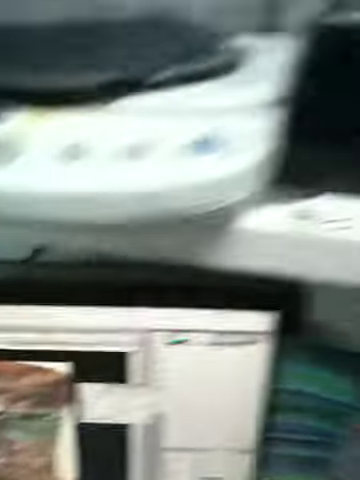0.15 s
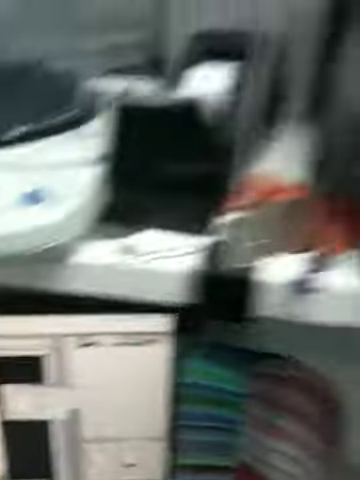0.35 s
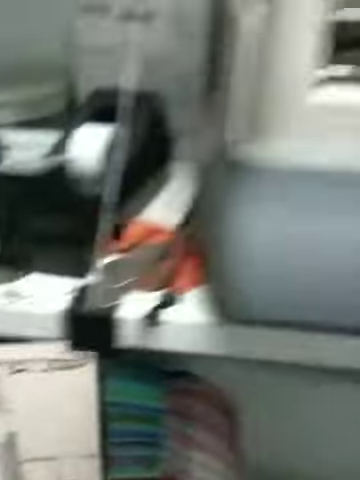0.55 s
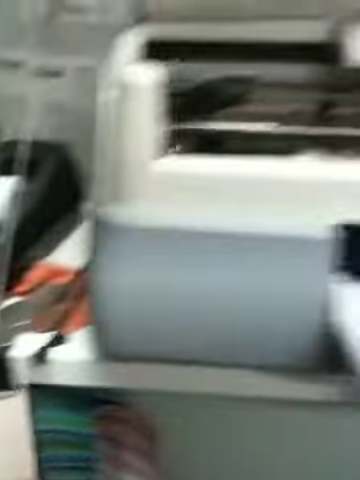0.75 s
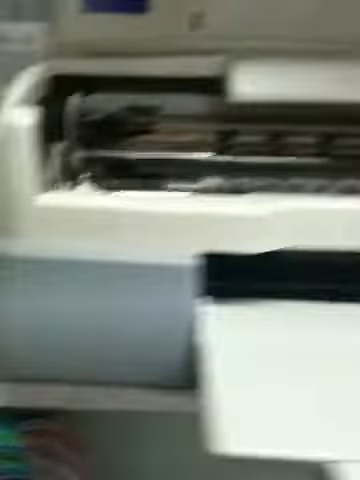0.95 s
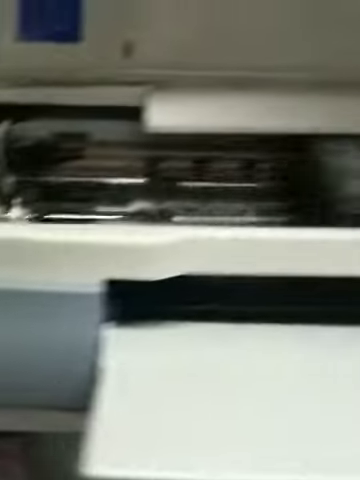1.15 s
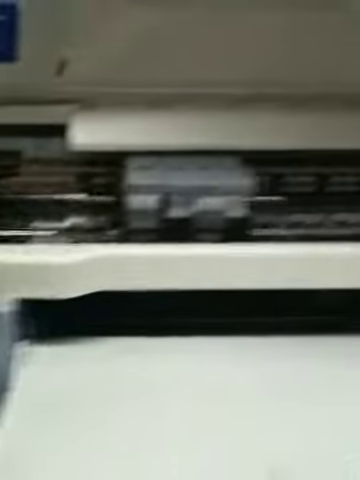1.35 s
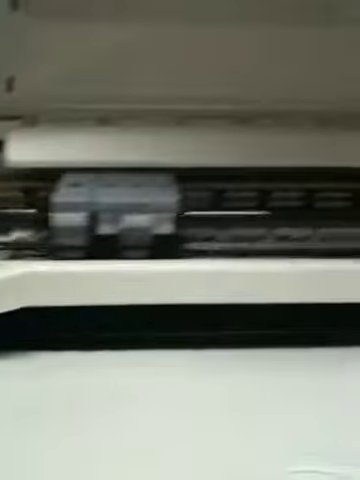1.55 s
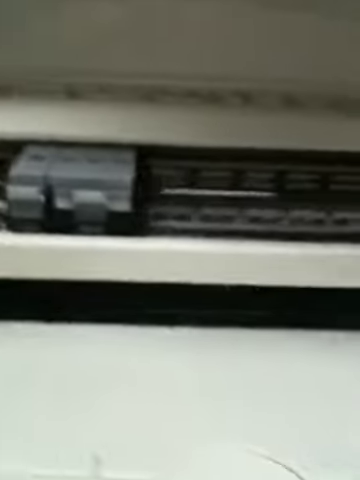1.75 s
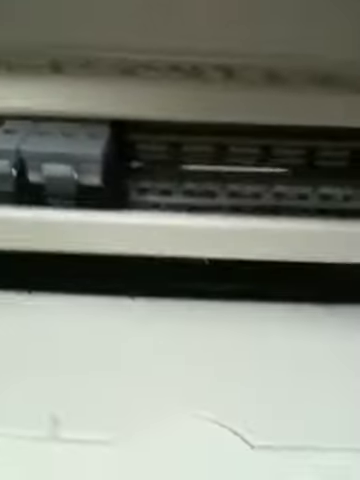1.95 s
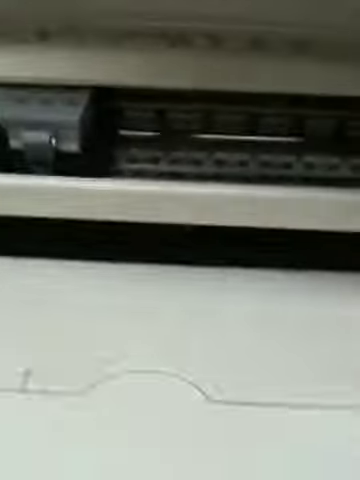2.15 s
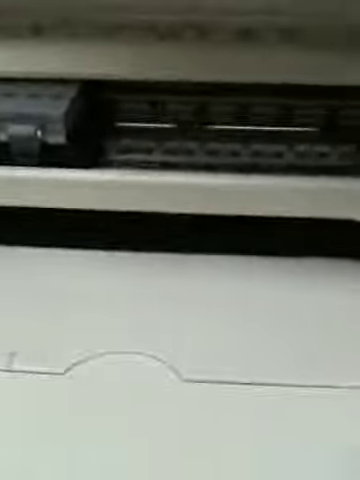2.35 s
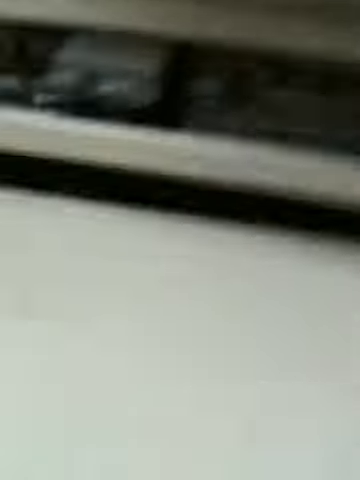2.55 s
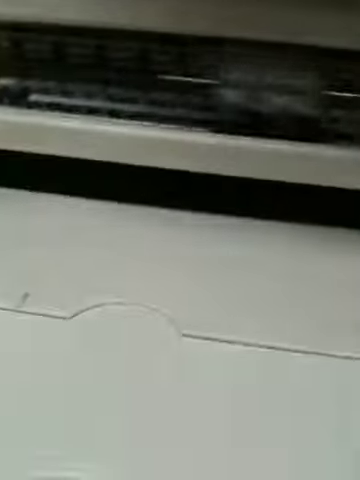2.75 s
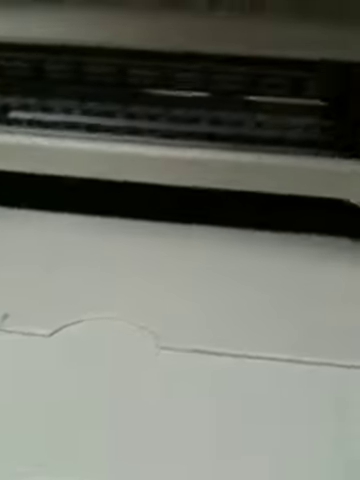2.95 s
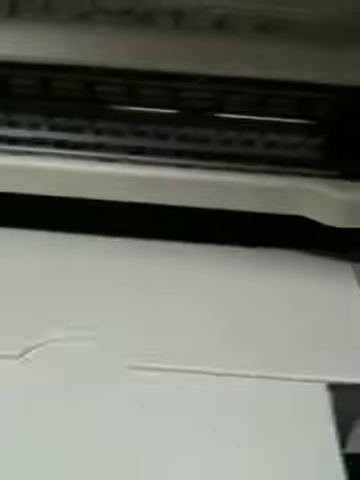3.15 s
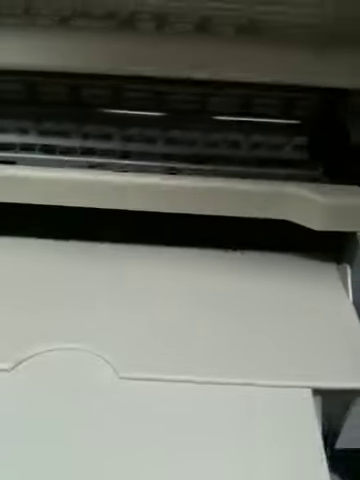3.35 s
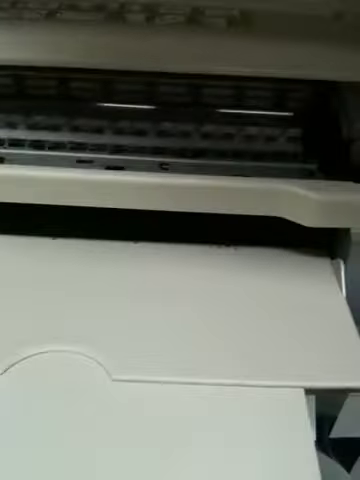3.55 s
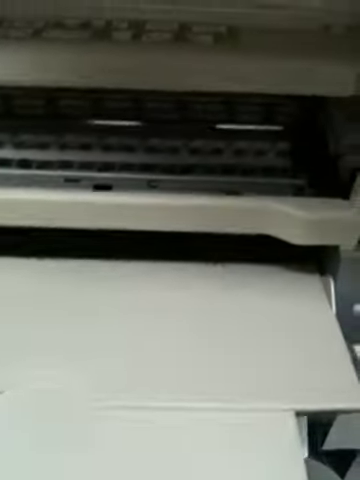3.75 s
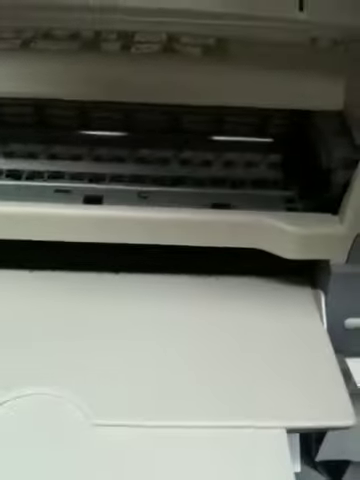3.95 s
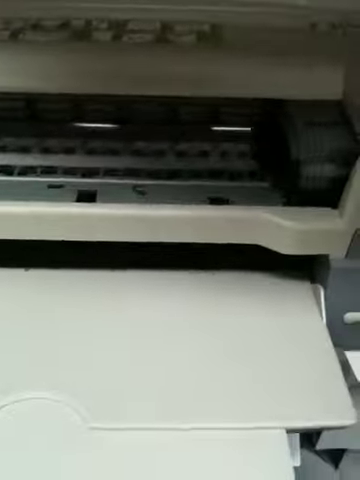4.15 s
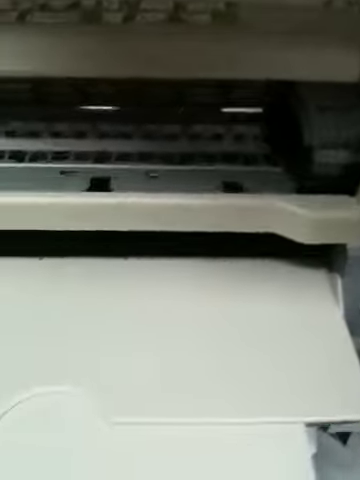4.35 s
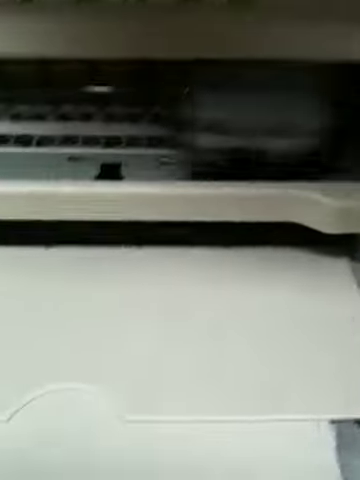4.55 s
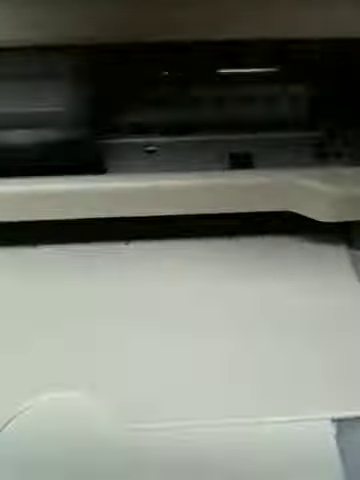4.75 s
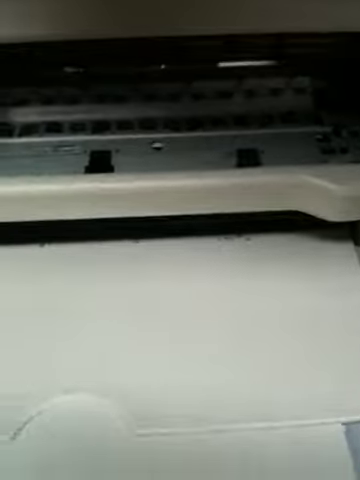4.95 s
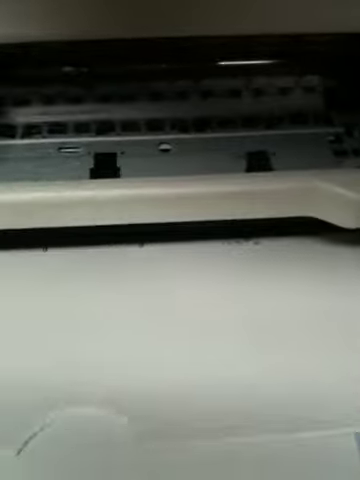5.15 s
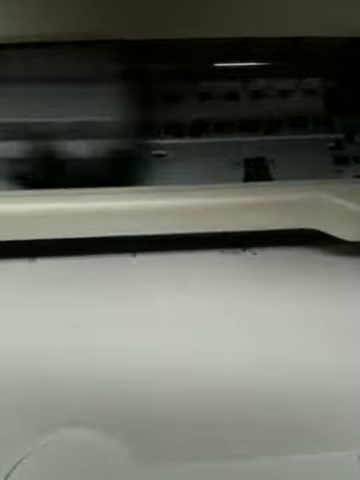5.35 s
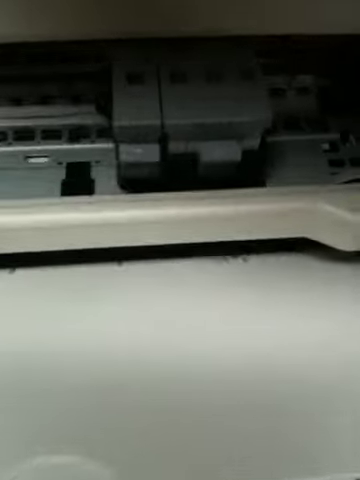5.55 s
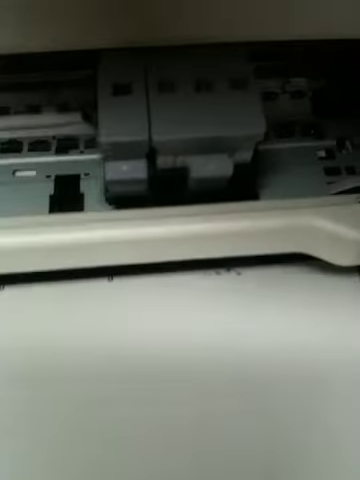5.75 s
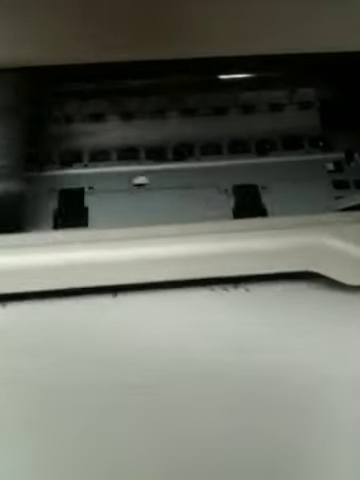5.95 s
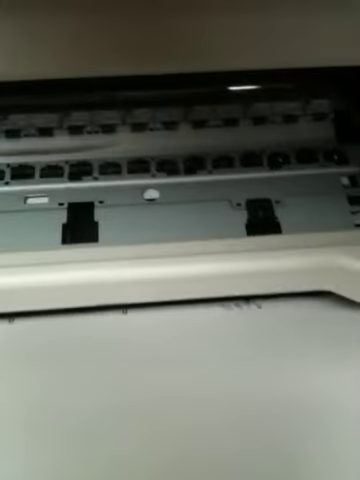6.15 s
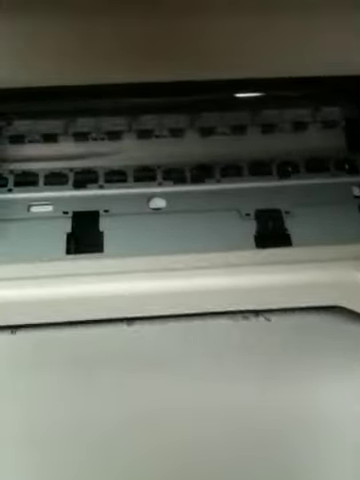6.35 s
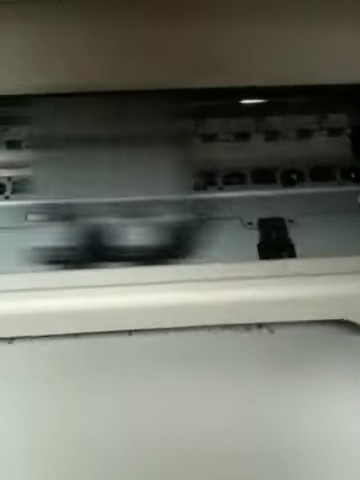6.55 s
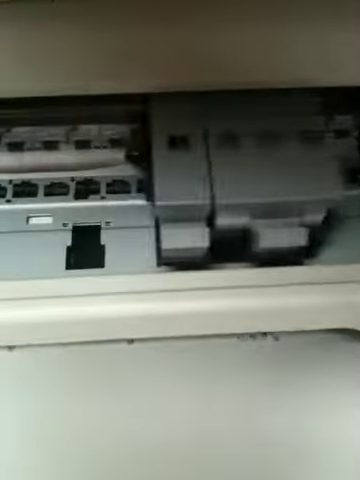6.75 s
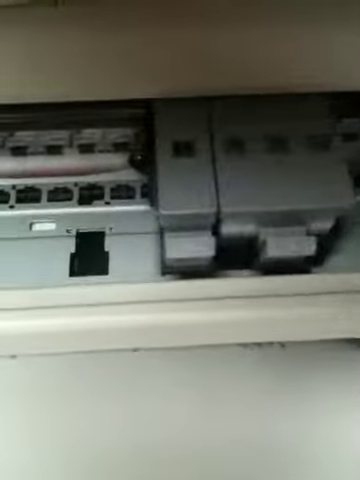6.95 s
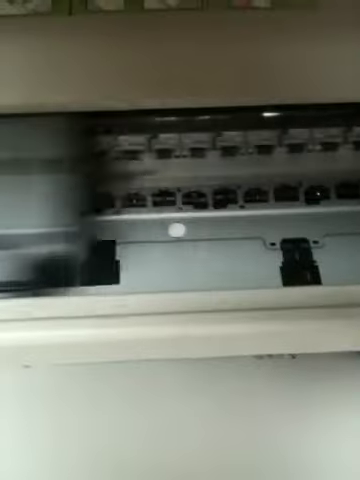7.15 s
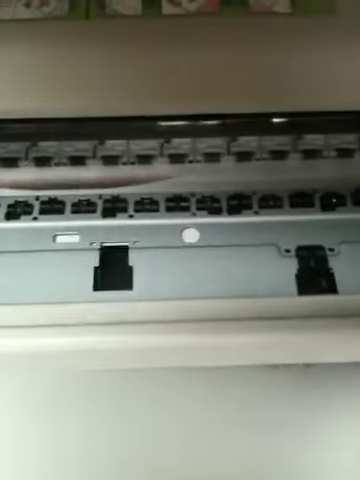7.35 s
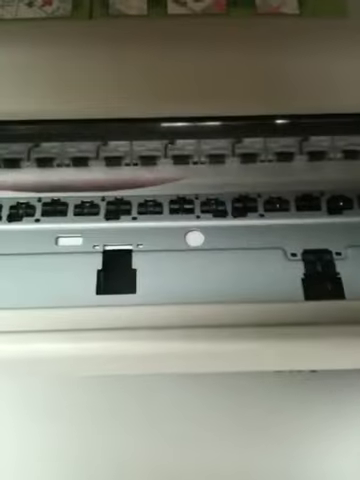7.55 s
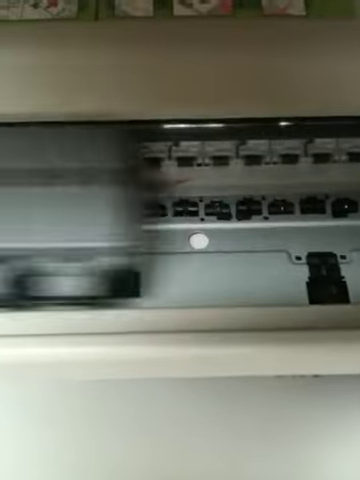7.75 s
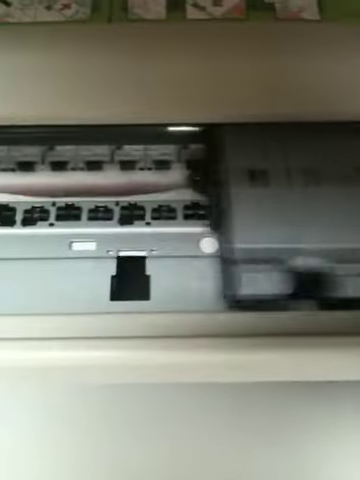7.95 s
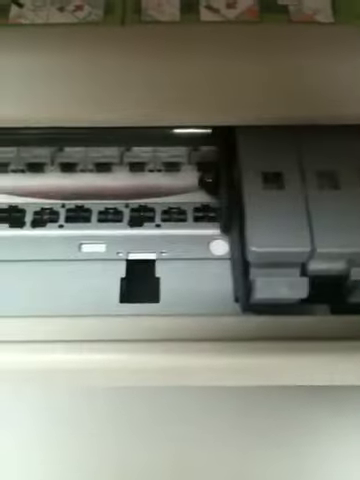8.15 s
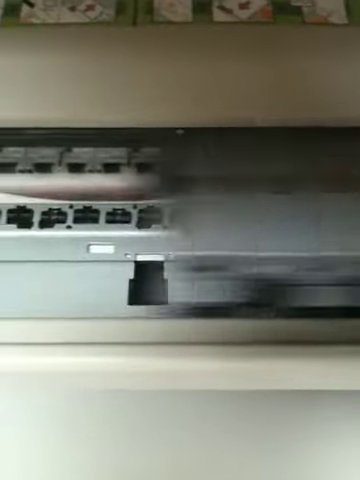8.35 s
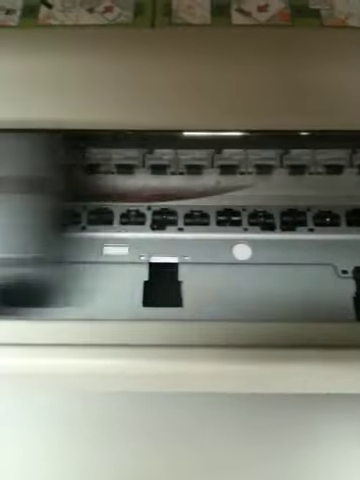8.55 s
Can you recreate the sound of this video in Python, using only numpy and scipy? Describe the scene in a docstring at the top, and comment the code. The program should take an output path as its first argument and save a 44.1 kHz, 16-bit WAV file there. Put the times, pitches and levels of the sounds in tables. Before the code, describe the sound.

An inkjet printer feeds paper, crunches once, then its print head sweeps back and forth with hissing passes and plastic knocks.

```python
"""A quiet room, one microphone at arm's length from an inkjet printer, a fan humming faintly nearby.
The paper roller turns, then the carriage sweeps to and fro, hissing on its rail while the toothed belt
sings. The plastic frame knocks as it brakes, and the later sweeps end with a short whine of the motor
coil. Paper rustles in the pauses, and the mechanism gives one loud crunch before the second sweep."""
import sys
import numpy as np
from scipy import signal
from scipy.fft import rfft, irfft, next_fast_len
from scipy.io import wavfile
from scipy.ndimage import uniform_filter1d, map_coordinates

SR = 44100
rng = np.random.default_rng(int(sys.argv[2]) if len(sys.argv) > 2 else 0)


def log_audio(samples):
    """Write samples as a 16-bit WAV file to the path given in sys.argv[1]."""
    # one column per channel
    frames = np.atleast_2d(samples).T
    # limit to full scale, then quantise
    limited = np.clip(frames, -1, 1)
    pcm = np.round(limited * 32767).astype(np.int16)
    wavfile.write(sys.argv[1], SR, pcm)


N = 379260
T = np.arange(N) / SR

# Carriage sweeps, leftward first, then alternating: (start [s], brake [s], stop [s], hiss [dB],
# rumble [dB], tooth tone [dB], its launch surge [dB], tooth rate [Hz], belt span from [Hz], to [Hz],
# span level [dB], motor drive squeal [dB], spin-up note [dB])
SWEEPS = [(0.95, 1.4, 1.497, -56, -67.5, -63.5, 4.5, 538.5, 562, 760, -68.5, -87, -85),
          (2.67, 3.118, 3.19, -55.5, -64.5, -59.5, -1, 542, 539, 715, -61.5, -72, -85),
          (4.519, 5.025, 5.119, -56, -64, -60, -3, 536.5, 541, 760, -69, -88, -55.5),
          (5.288, 5.612, 5.698, -54.5, -64, -58.5, 4, 531.7, 520.5, 780, -57.5, -66, -60),
          (5.879, 6.215, 6.296, -54, -63.5, -59, 6, 524.3, 516.4, 793.5, -64.5, -68.5, -62),
          (6.418, 6.791, 6.87, -53.5, -62, -59.5, 8, 519.5, 506, 736, -57.5, -61.5, -54),
          (7.079, 7.455, 7.546, -53.5, -61.5, -60, 9, 525, 518, 784, -62, -63, -57),
          (7.674, 8.07, 8.12, -53, -61.5, -57, 0.5, 529.5, 514, 693, -60, -62, -60),
          (8.383, 8.799, 8.89, -52.5, -62.5, -58.5, 4.5, 525, 512.5, 733, -58, -65.5, -62)]
# Each launch, levels relative to cruising:
# (time after start [s], speed [share of full], hiss [dB], rumble [dB], tooth tone [dB])
LAUNCH_CURVE = [(-.012, .1, -35, -20, -30), (.008, .2, -10, 0, -14), (0.045, .97, -0.5, 1.5, -15.5),
                (.07, 1, -0.5, 0.5, -7), (.1, 1, 0, 0, -0.5), (.2, 0.99, -0.5, -1, 0.5)]
# Each braking, levels relative to cruising:
# (time [share of brake to stop], speed [share of full], hiss [dB], rumble [dB], tooth tone [dB])
BRAKE_CURVE = [(-0.6, 1, -0.5, 0.5, -1), (-.1, 1, 0, 6.5, -4), (.35, .45, -9, 10, -8.5),
               (.95, .3, -9, 1, -5), (1.25, .1, -44, 11, -30)]
# The mechanism shuffling before the steady sweeps: (time [s], hiss [dB])
SHUFFLE_LEVELS = [(4.1, -94), (4.112, -48.5), (4.135, -62.5), (4.3, -71.5), (4.33, -83), (4.345, -70),
                  (4.436, -61.5), (4.469, -73), (4.485, -78)]
# Belt teeth on the pulley: (harmonic [x tooth rate], level over tooth tone [dB], width [Hz])
TOOTH_PARTIALS = [(1, -2, 80), (2, -0.5, 130)]
# Their overtones: (harmonic [x tooth rate], level over hiss [dB], growth along a sweep [dB], width [Hz])
MESH_PARTIALS = [(3, -21, 8.5, 70), (4, -22.5, 1, 88), (6, -21, 0, 80), (7, -20.5, 1.5, 80)]
# High squeal of the motor drive: (pitch [Hz], rise at mid-sweep [Hz], relative level [dB], width [Hz])
DRIVE_SQUEAL_PARTIALS = [(8410, 250, 5, 220), (6830, 60, -3, 150)]
# Rail hiss and the rumble of the mount under it: (frequency [Hz], relative density [dB])
RAIL_SPECTRUM = [(800, -23.5), (1300, -4), (1650, -4.5), (1900, -12.5), (2300, -6.5), (2700, -7.5),
                 (3250, -6.5), (4300, -7), (5700, -6.5), (6800, -2.5), (7700, -4.5), (8640, -3),
                 (13300, -7.5), (15800, -15.5)]
MOUNT_SPECTRUM = [(30, -58), (60, -14), (150, -4), (300, 0.5), (390, -8.5), (650, -2.5), (1400, -15.5),
                  (2500, -26.5), (4000, -60.5)]

# Blows to the frame: (time [s], strength [dB], bright part relative to frame [dB])
FRAME_BLOWS = [(0.45, -29.5, -11.5), (0.564, -45, -8), (0.585, -41, -8), (1.019, -38, -13),
               (1.395, -48.5, -0.5), (1.429, -53.5, 2), (1.497, -34.5, -20.5), (2.352, -55, -9),
               (2.724, -35.5, -15), (4.112, -45, -7), (4.341, -49.5, -11), (4.372, -40, -13.5),
               (4.389, -36.5, -22), (4.472, -30.5, -21.5), (5.018, -41.5, -16), (5.119, -32, -21),
               (5.287, -52, -7), (5.602, -43, -18), (5.623, -40.5, 0), (5.684, -41, -31),
               (5.699, -33.5, -21), (5.882, -56.5, 7), (6.186, -36.5, -25), (6.229, -45, -11),
               (6.312, -32.5, -20.5), (6.429, -55, -3), (6.788, -40.5, 0.5), (6.863, -32.5, -22),
               (7.081, -56.5, 8), (7.124, -52, 11), (7.483, -42.5, -11), (7.546, -30, -20),
               (7.674, -58, -3), (7.689, -49, -8), (8.079, -46.5, 2.5), (8.153, -31.5, -17.5),
               (8.387, -57.5, 7), (8.431, -49, 6.5)]
# Modes of the plastic frame and the lighter levers: (frequency [Hz], relative level [dB], T60 [s])
FRAME_MODES = [(250, -15.5, 0.04), (552, -4.5, 0.075), (703, 2, 0.043), (780, -2.5, 0.076), (848, 5, 0.028),
               (957, -10.5, 0.089), (1094, -11, 0.047)]
LEVER_MODES = [(1363, 0.5, 0.022), (1626, 7.5, 0.054), (2035, 2, 0.055), (2388, 2.5, 0.049),
               (2712, 2.5, 0.025), (3550, -6.5, 0.022), (4400, -1, .015), (5900, -9, 0.049)]
# The mechanism's crunch: (time [s], grit [dB], thud [dB])
CRUNCH_LEVELS = [(2.6, -50, -60), (2.612, -54.5, -58), (2.626, -31, -53), (2.636, -29, -37),
                 (2.652, -22.5, -29.5), (2.67, -24.5, -23.5), (2.692, -35, -32.5), (2.704, -52.5, -60),
                 (2.71, -53, -41)]
# Its sharp grit and heavy thud: (frequency [Hz], relative density [dB])
GRIT_SPECTRUM = [(1470, -29.5), (2500, -21), (5080, -11.5), (5620, -12), (7190, -8.5), (10300, -1),
                 (12400, -10.5), (13600, -20.5), (15800, -18.5)]
THUD_SPECTRUM = [(35, -60), (60, -33.5), (236, -2), (666, -1), (1020, -3), (1190, -8), (1370, -5),
                 (4000, -15.5), (5200, -36), (8800, -120)]

# Paper roller turning: (time [s], hiss [dB], low gear tone [dB])
ROLLER_LEVELS = [(0.43, -82, -89), (0.45, -60, -68), (0.524, -59.5, -60), (0.558, -73, -72),
                 (0.605, -58, -60.5), (0.76, -56, -61), (0.886, -52.5, -51), (0.96, -52.5, -62),
                 (1.016, -62, -78), (1.05, -86, -80)]
# Low and high partials of the feed gear: (harmonic [x gear pitch], relative level [dB])
GEAR_LOW_PARTIALS = [(1, -14), (2, 2), (3, -3.5)]
GEAR_HIGH_PARTIALS = [(4, -1.5), (5, 1.5), (8, -11), (10, -8.5)]
# Sliding paper and the chassis rumble under it: (frequency [Hz], relative density [dB])
FEED_SPECTRUM = [(1500, -24), (2500, -8.5), (5000, -8), (9100, -3.5), (13000, -14.5), (15800, -16.5)]
CHASSIS_SPECTRUM = [(60, -51), (150, -9), (300, -3), (500, -4.5), (740, 4.5), (950, -5.5), (1450, -6.5),
                    (1680, -3.5), (1900, -10.5), (2500, -10), (4000, -21), (6000, -63)]

# Motor coil holding the carriage: (time [s], strength [dB])
COIL_WHINES = [(0.7943, -54), (2.5714, -49), (4.3767, -49), (5.0742, -46.5), (5.6595, -46), (6.2757, -46),
               (6.827, -44), (7.5039, -51), (8.1149, -45)]
# Other brief thin notes: (start [s], end [s], from [Hz], to [Hz], level [dB])
THIN_NOTES = [(1.44, 1.5, 12000, 12600, -67), (3.328, 3.37, 1750, 1850, -70),
              (4.338, 4.364, 5900, 5930, -57.5), (4.357, 4.39, 13800, 11500, -64),
              (4.41, 4.482, 11900, 12600, -70), (7.452, 7.465, 9600, 9700, -56),
              (7.705, 7.731, 9200, 8800, -49), (8.058, 8.074, 8300, 8860, -46.5)]
# Dry rustles and ticks of paper and plastic: (time [s], hold [s], level [dB])
PAPER_RUSTLES = [(1.384, 0.0014, -50), (1.625, .005, -68), (1.757, 0.05, -73.5), (1.88, .045, -76),
                 (1.986, 0.077, -73.5), (2.052, 0.11, -76), (2.19, 0.065, -67), (2.352, 0.0091, -57),
                 (2.39, 0.18, -76), (2.55, 0.037, -59), (2.585, 0.066, -56), (2.723, 0.0088, -46),
                 (3.109, 0.003, -51.5), (3.165, .045, -64), (3.235, 0.021, -64.5), (3.569, 0.0036, -65.5),
                 (4.0706, 0.0037, -51.5), (4.11, 0, -45.5), (5.68, 0, -59), (6.233, 0.0024, -42.5),
                 (7.4144, 0, -46.5), (7.4485, 0.0025, -48)]
# Their bright colour: (frequency [Hz], relative density [dB])
PAPER_SPECTRUM = [(3000, -18), (6000, -14), (8500, -5), (11000, -8), (15000, -29.5)]
# The nearby fan: (pitch [Hz], level before trim [dB], width [Hz])
FAN_PARTIALS = [(123, -81, 11), (247, -74.5, 17), (291, -76.5, 15), (347, -76.5, 20)]
# Room tone: (frequency [Hz], relative density [dB])
ROOM_SPECTRUM = [(15, -99), (25, -50.5), (113, -9.5), (148, -11.5), (241, -8), (316, -9.5), (352, -9),
                 (392, -11.5), (881, -16.5), (1550, -24.5), (1820, -26), (2520, -29), (8730, -31.5),
                 (15800, -34.5)]


def carriage(shudder_db=6.5, spin_up_s=0.05):
    """Close up: the rail hisses, belt teeth mesh, the free span sings and the motor drive squeals."""
    shuffle = [(s, 0, db, db - 1, -120) for s, db in SHUFFLE_LEVELS]  # hiss and rumble only
    moves = [sweep_motion(*row[:6]) for row in SWEEPS] + [shuffle]
    speed, hiss_db, rumble_db, tooth_db, gate = curves(sorted(moves, key=lambda rows: rows[0][0]))
    columns = np.transpose(SWEEPS)
    sweep = np.clip(np.searchsorted(columns[0], T) - 1, 0, None)
    start, brake = columns[:2, sweep]
    surge_db, tooth_hz, from_hz, to_hz, span_db, squeal_db = columns[6:12, sweep]

    bump = lambda at_s, width_s: np.exp(-((T - start - at_s) / width_s) ** 2)
    leftward = 1 - sweep % 2  # launches to the left shake the mount
    rumble_db = rumble_db + shudder_db * leftward * bump(at_s=0.071, width_s=0.039) + 1.8 * wobble(13)
    tooth_db = tooth_db + surge_db * bump(at_s=0.11, width_s=0.042) + 1.2 * wobble(16)
    travel = np.clip((T - start - spin_up_s) / (brake - start - spin_up_s), 0, 1)
    arch = np.abs(np.sin(np.pi * travel))  # peaks at mid-sweep
    cruising = uniform_filter1d(1. * (arch > 1e-6), size=1500)

    teeth = sum(amp(db) * tone(k * np.clip(speed, 0, 1) * (tooth_hz + 4 * wobble(40)), width, steady=1)
                for k, db, width in TOOTH_PARTIALS)
    mesh = sum(amp(db + growth_db * travel) * tone(k * tooth_hz, width, steady=1)
               for k, db, growth_db, width in MESH_PARTIALS)
    span_hz = from_hz + travel * (to_hz - from_hz)  # the span shortens like a string, so its note climbs
    span = tone(span_hz, width_hz=80, steady=0.43)
    drive_squeal = sum(amp(db) * tone(hz + rise_hz * arch, width, steady=0.34)
                       for hz, rise_hz, db, width in DRIVE_SQUEAL_PARTIALS)
    return (gate * friction(hiss_db, RAIL_SPECTRUM, rumble_db, MOUNT_SPECTRUM)
            + gate * amp(tooth_db) * teeth
            + cruising * amp(hiss_db) * mesh
            + arch ** 0.45 * amp(span_db) * span
            + arch ** 0.76 * amp(squeal_db) * drive_squeal)


def sweep_motion(start, brake, stop, *cruise_db):
    """Speed and levels of one sweep as the carriage launches, cruises and brakes."""
    launch = [(start + s, *values) for s, *values in LAUNCH_CURVE]
    braking = [(brake + share * (stop - brake), *values) for share, *values in BRAKE_CURVE]
    return np.array(launch + braking) + [0, 0, *cruise_db]


def frame_knocks():
    """Every blow rings the plastic frame and the levers at slightly new strengths and pitches."""
    out, t = np.zeros(N), np.arange(SR // 12) / SR
    attack = 1 - np.exp(-t / 0.00096)
    ring = lambda modes: sum(
        amp(db + rng.normal(0, 3.2) - 60 * t / t60) * np.sin(2 * np.pi * hz * rng.normal(1, 0.032) * t)
        for hz, db, t60 in modes)
    for s, db, bright_db in FRAME_BLOWS:
        crack = uniform_filter1d(rng.standard_normal(len(t)), size=5)  # plastic dulls the crack
        rattle = 3.8 * amp(-60 * t / 0.059) * crack
        knock = ring(FRAME_MODES) + amp(bright_db) * (ring(LEVER_MODES) + rattle)
        add(out, s, amp(db - 10) * attack * knock)
    return out


def mechanism_crunch():
    """Parts grind past each other in jolts: sharp grit first, then heavy thuds."""
    grit_db, thud_db, gate = curves([CRUNCH_LEVELS])
    jolts = unit(amp(2.5 * wobble(400)))
    grit = amp(grit_db) * noise(GRIT_SPECTRUM, grain_db=4)
    thud = amp(thud_db) * noise(THUD_SPECTRUM, grain_db=5.5)
    return gate * jolts * (grit + thud)


def paper_roller(gear_hz=291, engaged_db=-59.5):
    """The feed gear hums on steady harmonics over the hiss of sliding paper."""
    hiss_db, low_db, gate = curves([ROLLER_LEVELS])
    slack_db = np.minimum(hiss_db - engaged_db, 0)  # zero once the gears mesh fully
    rumble_db = -53.5 + 0.7 * slack_db
    high_db = -62.5 + 4.1 * slack_db
    gear = lambda partials: sum(amp(db) * tone(np.full(N, k * gear_hz), width_hz=18, steady=2.6)
                                for k, db in partials)
    slide = friction(hiss_db, FEED_SPECTRUM, rumble_db, CHASSIS_SPECTRUM)
    return gate * (slide + amp(low_db) * gear(GEAR_LOW_PARTIALS) + amp(high_db) * gear(GEAR_HIGH_PARTIALS))


def coil_whines(whine_hz=14252, hold_s=0.0315):
    """Chopped current makes the motor coil sing; it clicks as it switches and rings on faintly."""
    out, t = np.zeros(N), np.arange(SR // 6) / SR
    attack = np.minimum(t / 0.00092, 1)
    since_off = np.maximum(t - hold_s, 0)
    release = 1.1 * amp(-60 * since_off / 0.0087) + 0.19 * amp(-60 * since_off / 0.12)
    for s, db in COIL_WHINES:
        add(out, s, amp(db) * attack * release * np.sin(2 * np.pi * whine_hz * t))
        for edge_s, click_db in ((0, -52), (hold_s - 0.001, -48)):
            click = np.diff(rng.standard_normal(len(t) + 1))
            add(out, s + edge_s, amp(click_db - 60 * t / 0.0062) * click)
    return out


def gliding_notes(creep_db=-70):
    """The coil beats with motor speed at spin-up and in the creep to a stop; other thin notes join in."""
    out = np.zeros(N)
    spin_ups = [(s + 0.008, s + 0.047, 13400, 8700, db) for s, *_, db in SWEEPS]
    shuffle_end = SHUFFLE_LEVELS[-1][0]
    creeps = [(s - 0.04, s + 0.03, 11950, 12600, creep_db) for s, _ in COIL_WHINES if s > shuffle_end]
    for start, end, from_hz, to_hz, db in spin_ups + creeps + THIN_NOTES:
        progress = np.linspace(0, 1, round((end - start) * SR))
        flutter_hz = 900 * uniform_filter1d(rng.standard_normal(len(progress)), size=90)
        phase = 2 * np.pi * np.cumsum(from_hz + progress * (to_hz - from_hz) + flutter_hz) / SR
        swell = np.abs(np.sin(np.pi * progress)) ** 0.48
        add(out, start, amp(db) * swell * np.sin(phase))
    return out


def paper_rustle(t60_s=0.03):
    """The sheet rustles in clumps, with short bright ticks of paper and plastic."""
    envelope, t = np.zeros(N), np.arange(SR // 4) / SR
    attack = 1 - np.exp(-t / 0.0031)
    for s, hold_s, db in PAPER_RUSTLES:
        add(envelope, s, attack * amp(db - 60 * np.maximum(t - hold_s, 0) / t60_s))
    return envelope * amp(2.1 * wobble(66)) * noise(PAPER_SPECTRUM, grain_db=5.5)


def room_tone(fan_trim_db=0.45, room_db=-66):
    """Behind the printer's sound, a nearby fan hums over the low, soft noise of the room."""
    fan = sum(amp(db) * tone(np.full(N, hz), width, steady=0.53) for hz, db, width in FAN_PARTIALS)
    return amp(fan_trim_db) * fan + amp(room_db + 0.31 * wobble(3.17)) * noise(ROOM_SPECTRUM)


def friction(hiss_db, hiss_spectrum, rumble_db, body_spectrum):
    """Dry friction hisses in the treble and shakes the body under it."""
    hiss = amp(hiss_db + 1.3 * wobble(45)) * unit(patchy(noise(hiss_spectrum, grain_db=3.5), depth_db=2))
    rumble = amp(rumble_db + 1.2 * wobble(25)) * noise(body_spectrum, grain_db=1.5)
    return hiss + rumble


def patchy(x, depth_db):
    """Random gain in patches of time and frequency, as uneven surfaces give."""
    spectra = signal.stft(x, nperseg=512)[2]
    bands = uniform_filter1d(rng.standard_normal(spectra.shape), size=4, axis=0)
    patches = unit(uniform_filter1d(bands, size=9, axis=1))
    return signal.istft(spectra * amp(depth_db * patches), nperseg=512)[1][:N]


def tone(hz, width_hz, steady):
    """A partial of rms 1 whose size and phase flutter about a steady part."""
    phase = (2 * np.pi * (np.cumsum(hz / SR) % 1)).astype(np.float32)
    return unit((steady + wobble(width_hz)) * np.cos(phase) + wobble(width_hz) * np.sin(phase))


def noise(spectrum, grain_db=0):
    """Coloured noise of rms 1; grain makes single samples stand out."""
    knots_hz, db = np.transpose(spectrum)
    grains = rng.standard_normal(N) * amp(grain_db * rng.standard_normal(N))
    return unit(filtered(grains, lambda hz: amp(np.interp(np.log(hz + 1), np.log(knots_hz), db))))


def filtered(x, response):
    """x shaped by a gain that depends on frequency."""
    size = next_fast_len(N + 8192)
    return irfft(rfft(x, size) * response(np.fft.rfftfreq(size, 1 / SR)), size)[:N]


def wobble(rate):
    """A smooth random curve, rate knots a second."""
    coarse = T[::32]
    knots = rng.standard_normal(int(N * rate / SR) + 4)
    return np.interp(T, coarse, map_coordinates(knots, [coarse * rate]))


def curves(tables):
    """One value per sample for each column after time, and a gate that is 1 while a table plays."""
    times, *columns = np.transpose(np.vstack(tables))
    gate = sum((T > rows[0][0]) & (T < rows[-1][0]) for rows in tables)
    return [np.interp(T, times, column) for column in columns] + [uniform_filter1d(1. * gate, size=400)]


def add(out, s, sound):
    """Mix a sound in at time s."""
    part = out[round(s * SR):][:len(sound)]
    part += sound[:len(part)]


def amp(db):
    """Decibels to amplitude."""
    return np.exp(np.asarray(db) * (np.log(10) / 20))


def unit(x):
    """x scaled to rms 1."""
    return x / np.sqrt(np.mean(x ** 2) + 1e-20)


def scene():
    """The printer at arm's length over the room tone, in mono."""
    room = room_tone()
    printer = (carriage() + paper_roller() + frame_knocks() + coil_whines() + gliding_notes()
               + paper_rustle() + mechanism_crunch())
    return (printer + room)[None]


def record(dry, bass_hz=45, top_hz=15830):
    """The phone's microphone fades out in the deep bass and keeps nothing above its band limit."""
    return filtered(dry[0], lambda hz: (hz < top_hz) * hz ** 2 / (hz ** 2 + bass_hz ** 2))[None]


dry = scene()
out = record(dry)
log_audio(out)
```